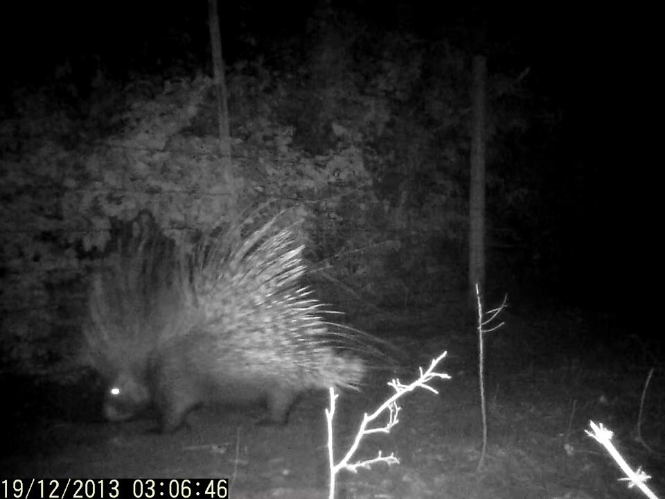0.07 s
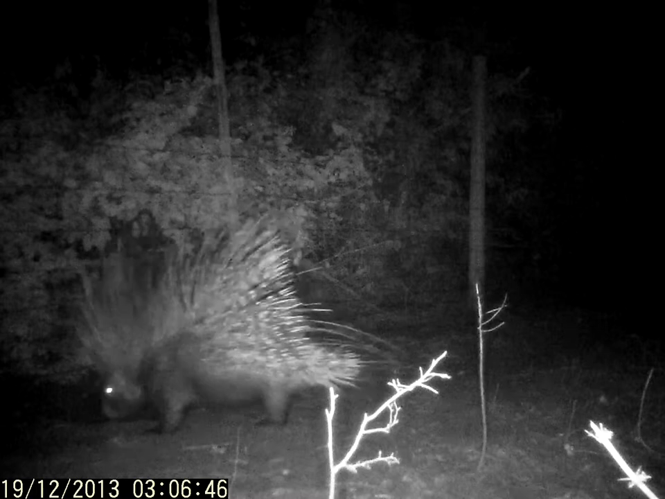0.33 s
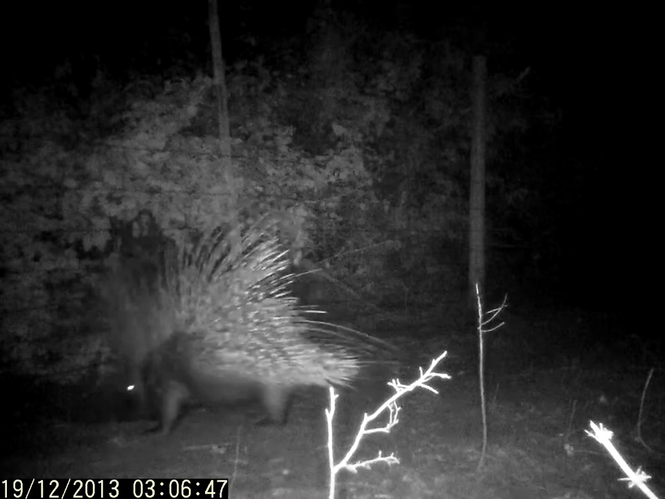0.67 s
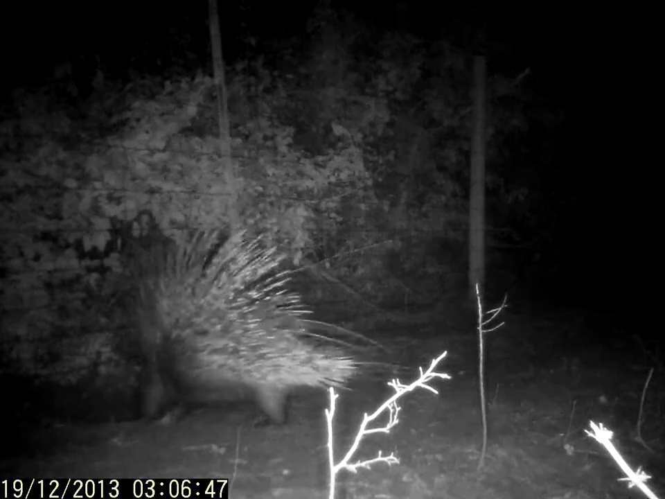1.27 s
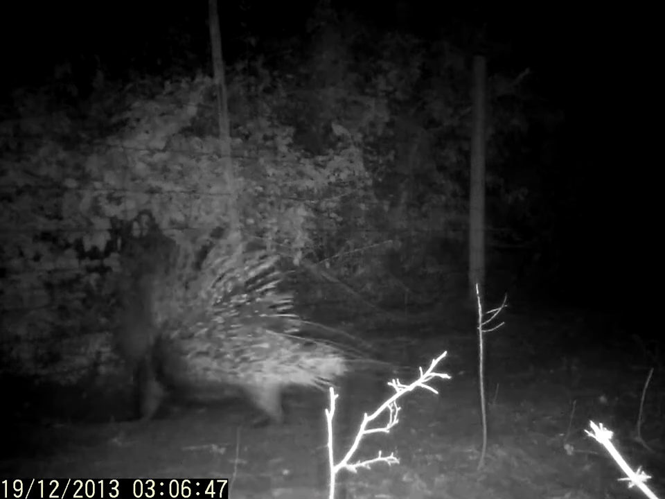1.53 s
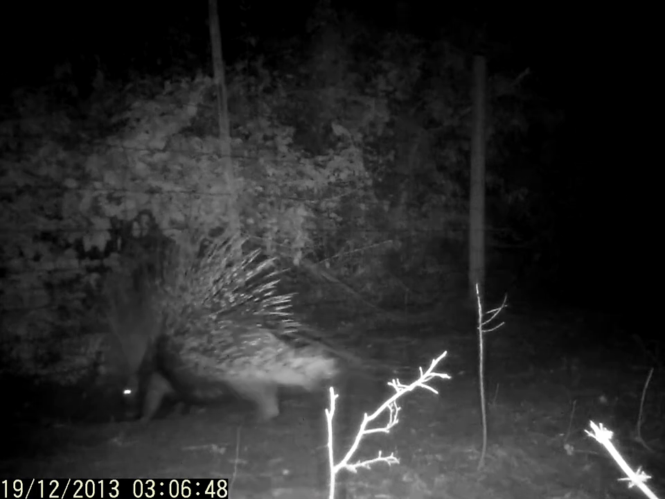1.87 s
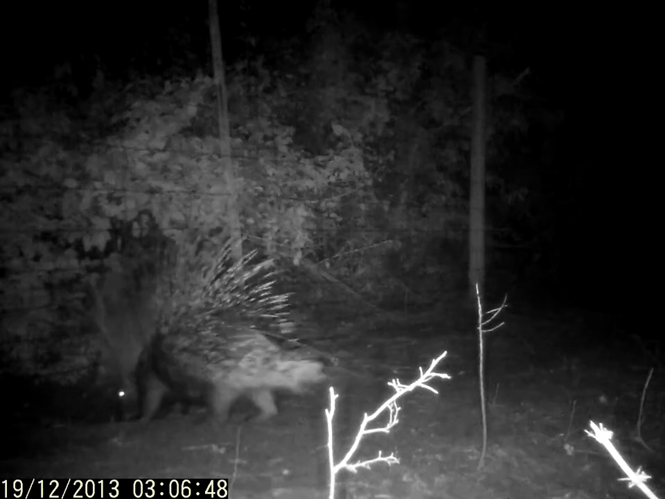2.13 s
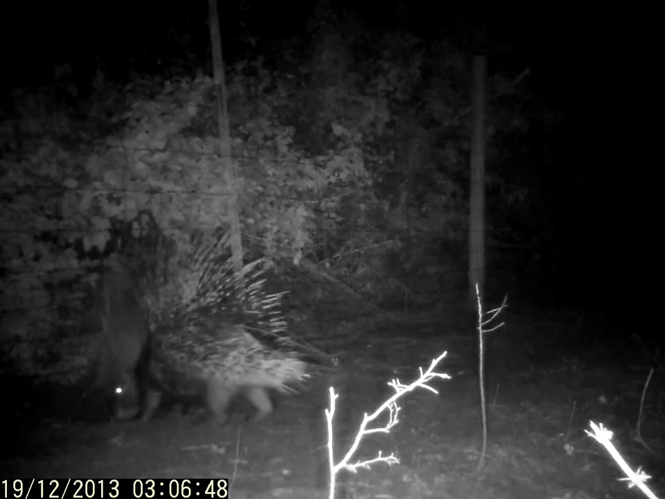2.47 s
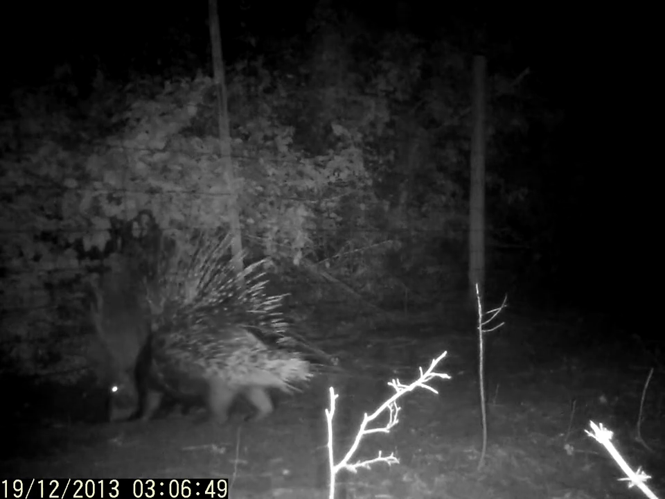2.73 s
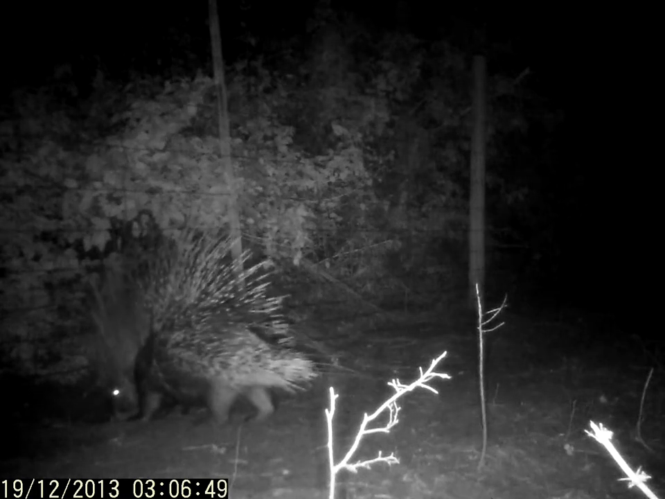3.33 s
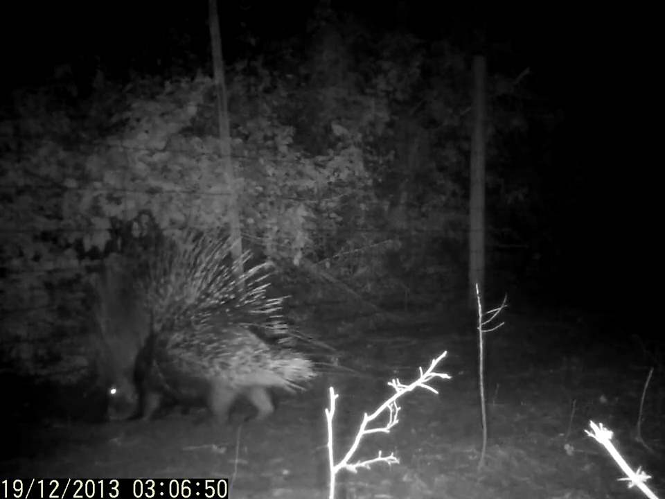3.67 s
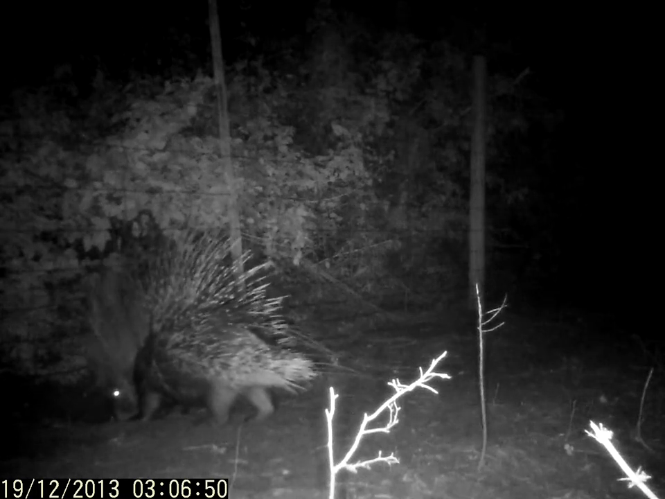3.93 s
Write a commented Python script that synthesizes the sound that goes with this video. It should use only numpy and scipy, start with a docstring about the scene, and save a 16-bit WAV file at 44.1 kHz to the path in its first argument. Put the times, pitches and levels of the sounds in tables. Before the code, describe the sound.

After a soft pop, night crickets chirp near and far above hiss and a thin whine.

```python
"""Crickets in the bush at night, heard by a trail camera that has just woken up.
The input switches on with a pop and fades in by small clicking steps, then hisses and whines steadily.
Over a far chorus, near crickets chirp and rasp by stridulation, their sound scattered by the leaves.
From about one second on, something hoots faintly three times; a thin tone sounds near the end."""
import sys
import numpy as np
from scipy import signal
from scipy.fft import rfft, irfft, next_fast_len
from scipy.io import wavfile
from scipy.ndimage import map_coordinates

SR = 44100
rng = np.random.default_rng(int(sys.argv[2]) if len(sys.argv) > 2 else 0)


def store_pcm(level_fs):
    """Save levels as 16-bit WAV."""
    pcm = np.round(np.clip(level_fs, -1, 1) * 32767).astype(np.int16)
    wavfile.write(sys.argv[1], SR, np.atleast_2d(pcm).T)


N = 176400


def amp(db):
    """Decibels to amplitude ratio."""
    return 10 ** (np.asarray(db) / 20)


def wobble(rate_hz, size):
    """Smooth random modulation: a spline through rate_hz Gaussian knots a second."""
    knots = rng.standard_normal(int(size * rate_hz / SR) + 4)
    return map_coordinates(knots, [np.arange(size) * rate_hz / SR])


def filtered(x, response):
    """Linear filtering: the spectrum of x times a frequency response."""
    size = next_fast_len(N + SR // 2)
    return irfft(rfft(x, size) * response(np.fft.rfftfreq(size, 1 / SR)), size)[:N]


def add(track, centre_s, sound):
    """Superposition: mix a sound into the track around its centre time."""
    at = round(centre_s * SR) - len(sound) // 2 + np.arange(len(sound))
    inside = (at >= 0) & (at < N)
    track[at[inside]] += sound[inside]


def waking_input(sound, on_s=.07256, step_db=.5, dip_s=.0005, dip_db=-1):
    """Step transients: a draining voltage offset pops at switch-on and clicks at each step in gain."""
    # Instants at which the gain steps up: start_s
    steps = [.1815, .2151, .2402, .2778, .3025, .3222, .3488, .3685, .3854, .4075, .4248, .4395, .4578,
             .4735, .4873]
    t = np.arange(N) / SR
    gain_db = step_db * np.searchsorted(steps, t)
    for start_s in steps[2::3]:  # every third step first dips for an instant
        gain_db += dip_db * ((t > start_s - dip_s) & (t <= start_s))
    hold_s, decay_s = .135, .147
    age = np.maximum(t - hold_s, 0) / decay_s
    offset = .325 * (1 + age) * np.exp(-age)
    attenuated = amp(-step_db * len(steps)) * sound  # the steps bring it back to full level
    return (t > on_s) * amp(gain_db) * (offset + attenuated)


def hiss_and_whine(whine_hz=8654, flip_hz=33.05, upper_hz=14297.4):
    """Self-noise: broadband hiss and two whines; polarity flips split the stronger into sidebands."""
    # Spectral density of the microphone's rumble and hiss: frequency_hz, density_db_per_hz
    noise_floor = [(4, -58.5), (15, -65), (40, -74), (90, -79.5), (180, -83), (350, -86.5), (700, -89),
                   (1400, -92), (2600, -94.5), (4800, -96.5), (7000, -99), (11000, -100.9), (14500, -101.8),
                   (15800, -106)]
    hz, db = np.transpose(noise_floor)
    white = rng.standard_normal(N) * np.sqrt(SR / 2)  # unit power per hertz
    hiss = filtered(white, lambda f: amp(np.interp(np.log(f + 1), np.log(hz + 1), db)))
    t = np.arange(N) / SR
    polarity = np.sign(np.sin(2 * np.pi * flip_hz * t))
    whine = amp(-59) * polarity * np.sin(2 * np.pi * whine_hz * t)
    upper_whine = amp(-71.5) * np.sin(2 * np.pi * upper_hz * t)
    return hiss + whine + upper_whine


def wing_stroke(pitch_hz, length_s, sag, rough_rad):
    """Stridulation: the file drives the wing's tone, which falls by the share sag as the wing slows."""
    travel = np.linspace(-.5, .5, int(length_s * SR))
    phase = 2 * np.pi * np.cumsum(pitch_hz * (1 - sag * travel)) / SR
    phase += rough_rad * wobble(rate_hz=292, size=len(travel))
    return np.cos(np.pi * travel) * np.sin(phase + rng.uniform(0, 2 * np.pi))


def chirp(pitch_hz, period_s=.028, swell_db=4, fade_db=7):
    """A pulse train: five wing strokes swell and fade, stroke by stroke, with the crest at the centre."""
    track, centre_s = np.zeros(N), .15
    for k in range(-3, 2):
        level_db = (swell_db * k if k < 0 else -fade_db * k) + rng.normal(0, 1)
        stroke_hz = pitch_hz * (1 + rng.normal(0, .004))
        stroke = wing_stroke(stroke_hz, length_s=.018, sag=.09, rough_rad=.74)
        add(track, centre_s + k * period_s, amp(level_db) * stroke)
    return track[:int(2 * centre_s * SR)]


def leaf_scatter(sound, scatter_db=-.5, t60_s=.2):
    """Diffuse scattering: the foliage adds an exponentially decaying tail to the direct sound."""
    t = np.arange(SR // 4) / SR
    tail = rng.standard_normal(len(t)) * amp(-60 * t / t60_s)
    response = amp(scatter_db) * tail / np.linalg.norm(tail)
    response[0] += 1  # direct path
    return np.pad(signal.fftconvolve(sound, response), (len(t) - 1, 0))  # keeps the sound centred


def far_crickets(count=60):
    """Incoherent summation: many overlapping chirps of each kind blur into a shimmering band."""
    # Far choruses: pitch_hz, pitch_spread_ratio, rms_db
    choruses = [(4030, 0.0361, -63), (3092, 0.029, -69.5), (5267, 0.0164, -70.5)]
    out = np.zeros(N)
    for pitch_hz, spread, rms_db in choruses:
        band = np.zeros(N)
        for k in range(count):
            centre_s = (k + rng.uniform()) / count * (N / SR + .1)
            add(band, centre_s, leaf_scatter(chirp(pitch_hz * (1 + spread * rng.normal()))))
        out += amp(rms_db) * band / np.sqrt(np.mean(band ** 2))
    return out


def near_crickets():
    """Stridulation close by: single chirps stand out, each scattered along its own paths."""
    # Near chirps, at the crest and before scattering: centre_s, pitch_hz, level_db
    chirps = [(0.209, 3930, -46), (.29, 4170, -52), (.452, 3900, -49.5), (.535, 4060, -51),
              (.612, 4040, -53), (0.634, 4210, -51), (0.726, 4050, -51.5), (.885, 4160, -45),
              (1.055, 3860, -54), (1.118, 4130, -55), (1.15, 3920, -44.5), (1.255, 4170, -53),
              (1.394, 3980, -49), (1.447, 4170, -49), (1.635, 4050, -50), (1.71, 3970, -53),
              (1.96, 4147, -45), (2.005, 4130, -52.5), (2.155, 4150, -56), (2.215, 4100, -50.5),
              (2.235, 3880, -47.5), (2.285, 3930, -46), (2.426, 4000, -54), (2.522, 4160, -47.5),
              (2.545, 3890, -55), (2.635, 4130, -53.5), (2.801, 4160, -50), (2.862, 3920, -52.5),
              (2.99, 4017, -53.5), (3.042, 4130, -46), (3.345, 4040, -54.5), (3.418, 3950, -48.5),
              (3.478, 4120, -49.5), (3.579, 3890, -48), (3.885, 4184, -48.5), (3.995, 3920, -59)]
    out = np.zeros(N)
    for centre_s, pitch_hz, level_db in chirps:
        add(out, centre_s, amp(level_db) * leaf_scatter(chirp(pitch_hz)))
    return out


def rasping_cricket():
    """Random phase modulation broadens a lower-pitched cricket's single strokes into rasps."""
    # Rasps, before scattering: centre_s, level_db
    rasps = [(0.571, -58), (0.65, -57.5), (.735, -58.5), (1.125, -57), (1.206, -56.5), (2.041, -57.5),
             (2.114, -58.5), (2.198, -59), (2.987, -60), (3.075, -57.5), (3.709, -59), (3.785, -56.5),
             (3.873, -58)]
    out = np.zeros(N)
    for centre_s, level_db in rasps:
        stroke = wing_stroke(pitch_hz=3154, length_s=.055, sag=.093, rough_rad=1.27)
        add(out, centre_s, amp(level_db) * leaf_scatter(stroke))
    return out


def distant_hoots(pitch_hz=175.5, length_s=.2):
    """Harmonics of one wavering fundamental fuse into a soft low hoot, heard about once a second."""
    # Hoots: centre_s, level_db
    hoots = [(1.22, -53.5), (2.3, -52.5), (3.365, -53.5)]
    # Spectrum of a hoot: harmonic_number, relative_level_db
    partials = [(1, -3), (4, -5), (5, -14.5), (8, -11), (9, -17.5)]
    out, size = np.zeros(N), int(length_s * SR)
    for centre_s, level_db in hoots:
        fundamental_hz = pitch_hz * (1 + .014 * wobble(rate_hz=28.8, size=size))
        phase = 2 * np.pi * np.cumsum(fundamental_hz) / SR
        voice = sum(amp(db) * np.sin(harmonic * phase) for harmonic, db in partials)
        add(out, centre_s, amp(level_db) * np.hanning(size) * voice)
    return out


def thin_tone(start_s=3.6, length_s=.315, waver_rad=.23):
    """Three harmonics of one low pitch, each wavering in phase, add up to a faint held tone."""
    # Harmonics 5, 6 and 11 of an absent fundamental near 230.5 Hz: frequency_hz, level_db
    partials = [(1152, -64), (1384, -63.5), (2536, -65.5)]
    t = np.arange(int(length_s * SR)) / SR
    out, tone = np.zeros(N), np.zeros(len(t))
    for hz, db in partials:
        tone += amp(db) * np.sin(2 * np.pi * hz * t + waver_rad * wobble(rate_hz=26, size=len(t)))
    add(out, start_s + length_s / 2, tone * signal.windows.tukey(len(t), .5))
    return out


def scene():
    """Superposition of the night bush and the camera's own noise, in one channel."""
    crickets = near_crickets() + rasping_cricket() + far_crickets()
    return (crickets + distant_hoots() + thin_tone() + hiss_and_whine())[None]


def record(dry):
    """Band limiting: the sound passes through the waking input, then a sharp low-pass filter."""
    cutoff_hz = 15850
    return filtered(waking_input(dry[0]), lambda hz: hz < cutoff_hz)[None]


dry = scene()
out = record(dry)
store_pcm(out)
```